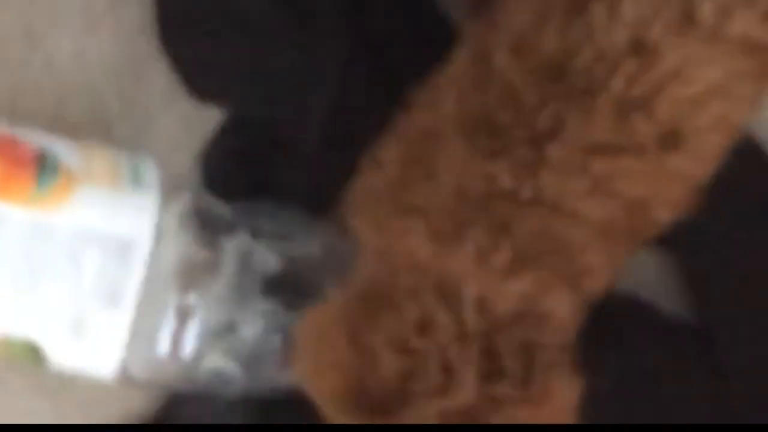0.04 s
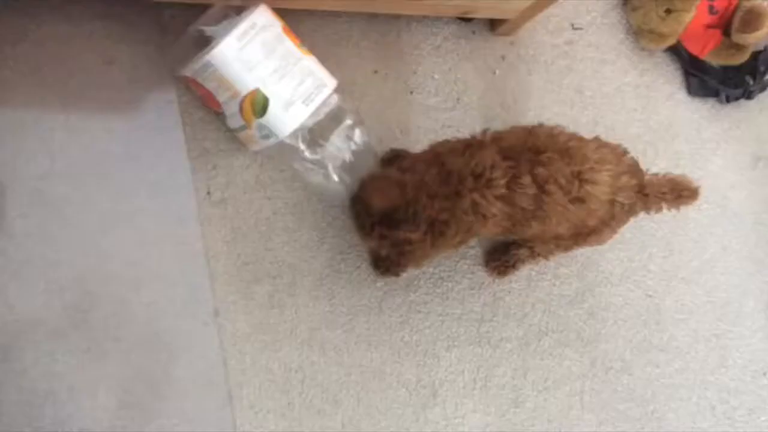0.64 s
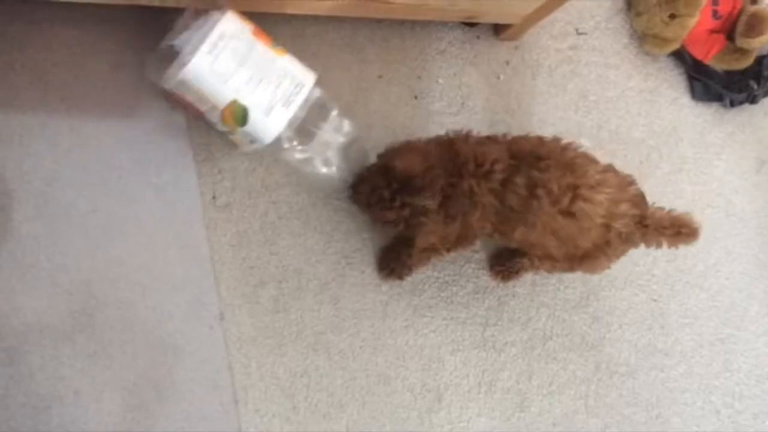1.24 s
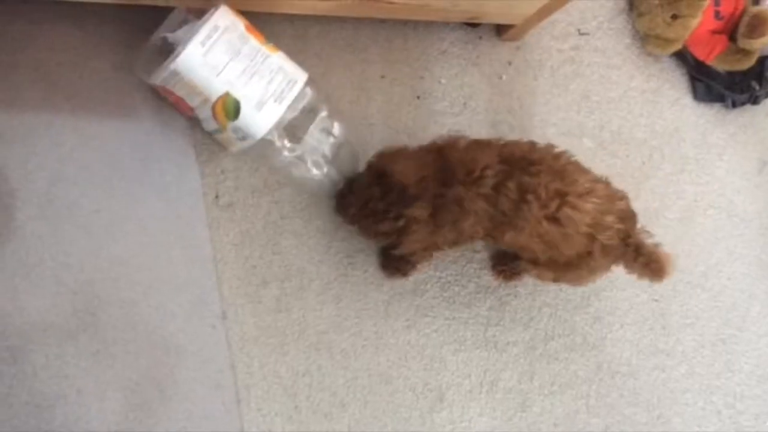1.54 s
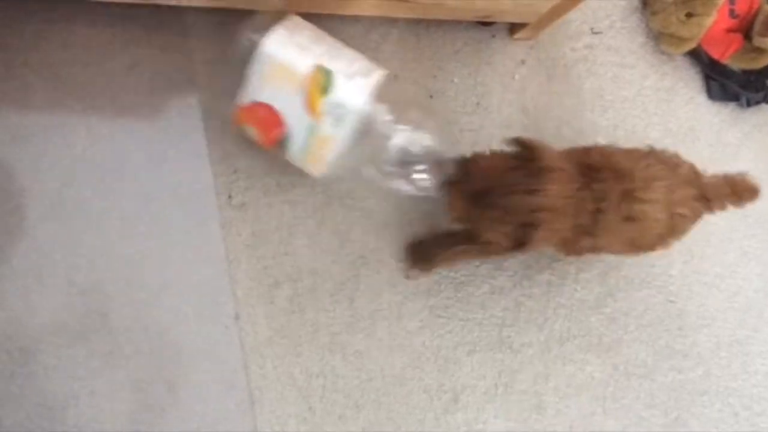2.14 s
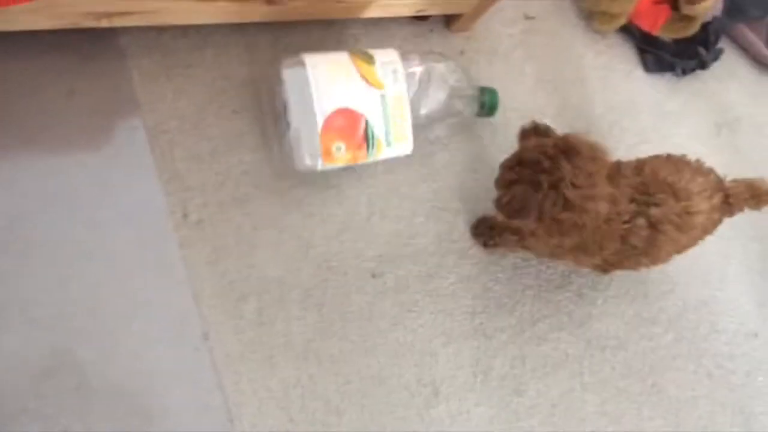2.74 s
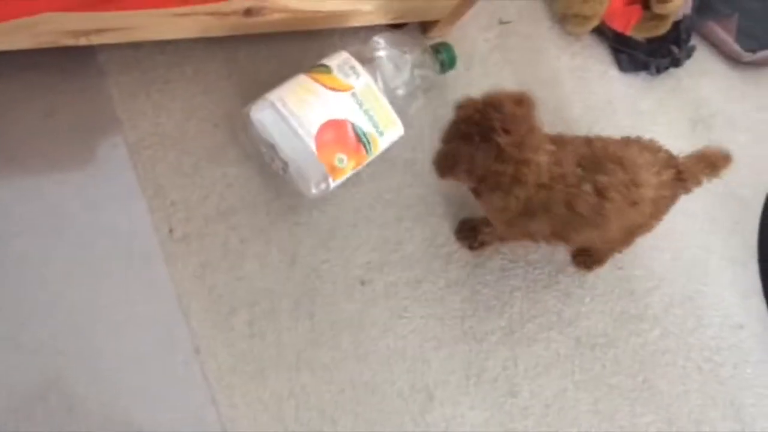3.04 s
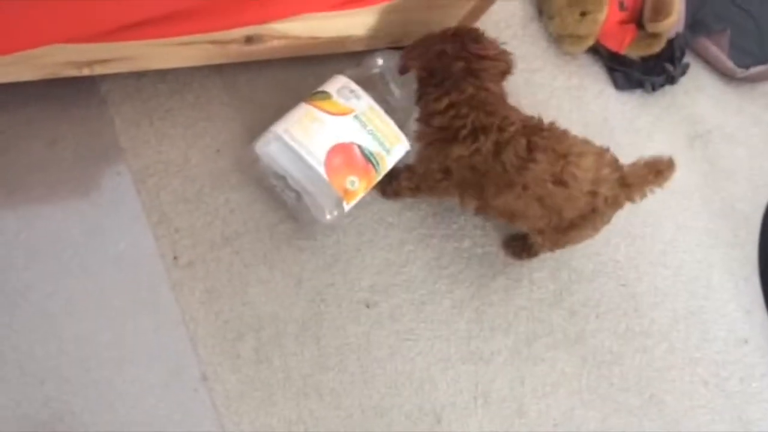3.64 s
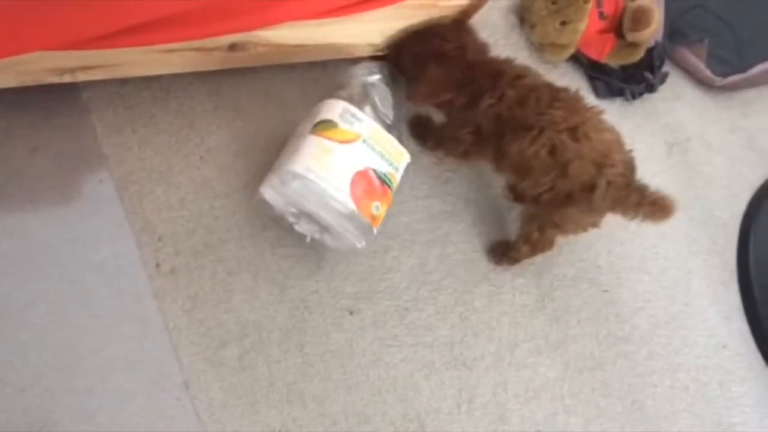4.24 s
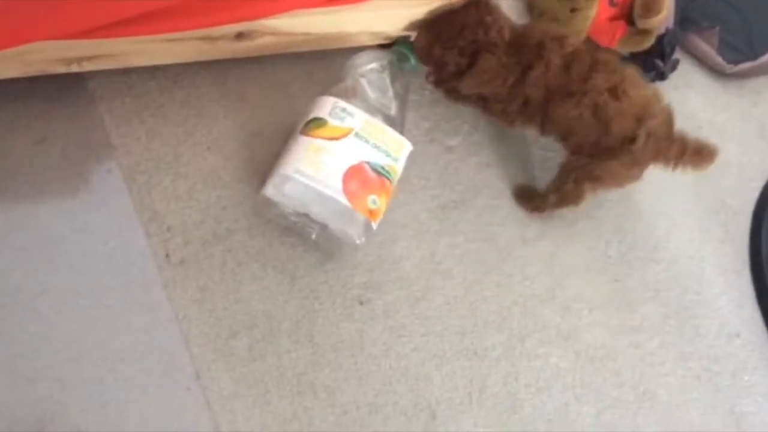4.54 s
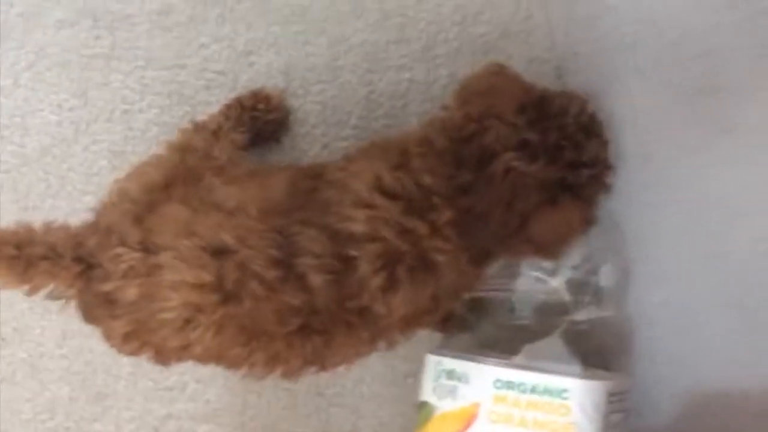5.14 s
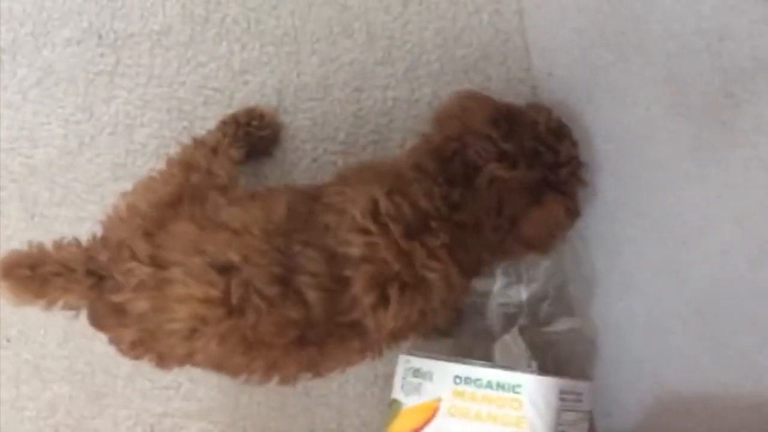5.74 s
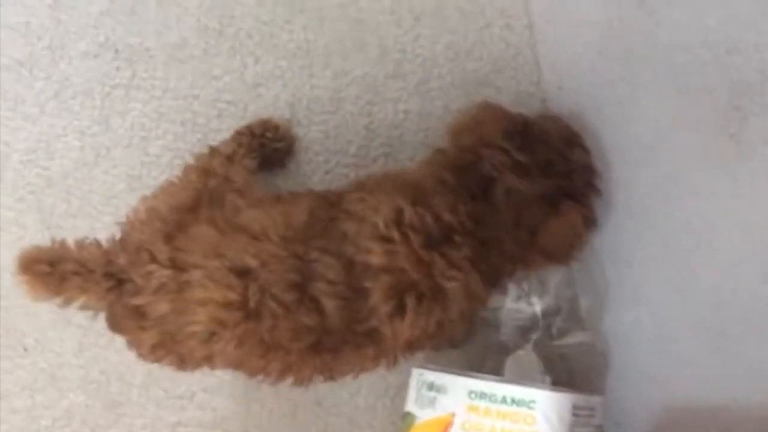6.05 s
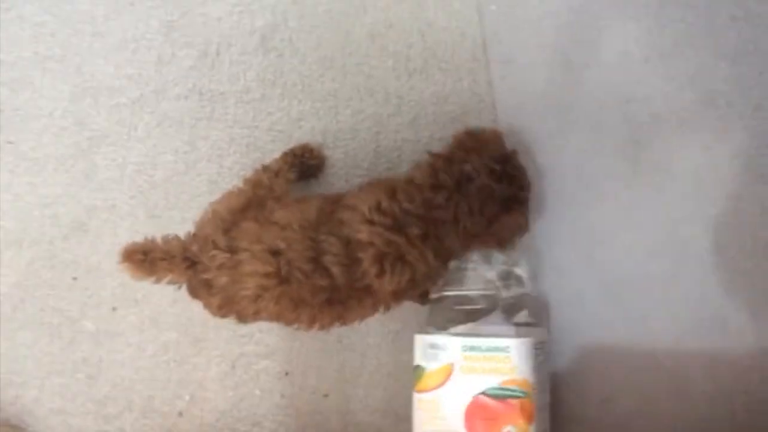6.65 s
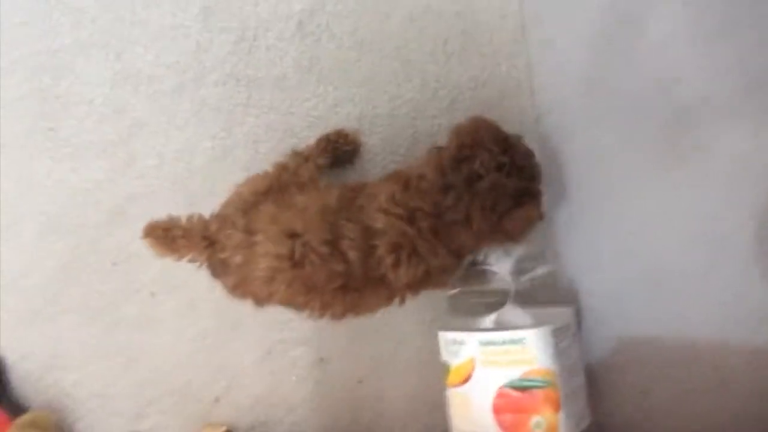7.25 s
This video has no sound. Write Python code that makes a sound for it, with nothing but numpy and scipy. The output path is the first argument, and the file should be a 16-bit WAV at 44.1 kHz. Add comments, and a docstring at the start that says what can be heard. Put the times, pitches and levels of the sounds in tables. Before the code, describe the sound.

Hollow knocks, crinkles and small snaps come in uneven bursts as a puppy paws and chews an empty plastic bottle indoors.

```python
"""In a small, quiet room, a puppy noses, paws and bites a big thin plastic bottle on the carpet.
Each knock bends a wall of the bottle, makes the air inside boom, rattles the stiff ribs and may
snap a crease. In between, tiny creases crackle, muzzle and paws scuff the plastic, and there are
brief squeaks and snuffles. Fur and carpet rustle over still air and the faint hum of an appliance."""
import sys
import numpy as np
from scipy import signal
from scipy.fft import rfft, irfft
from scipy.io import wavfile

SR = 44100
rng = np.random.default_rng(int(sys.argv[2]) if len(sys.argv) > 2 else 0)


def transcribe(u):
    """Save the signal u as a 16-bit wav file named by the first command-line argument.

    u: samples, shape (n,) or (channels, n), limited to [-1, 1]; the rate is SR.
    q: integer samples, one column per channel.
    """
    v = np.clip(np.atleast_2d(u).T, -1, 1)
    q = np.round(v * 32767).astype(np.int16)
    wavfile.write(sys.argv[1], SR, q)


N = 331191
TIME = np.arange(N) / SR
AGE = TIME[:SR // 3]  # seconds since a short sound began

# Knocks and bites. Each row: start in seconds, wall pitch in Hz, then the levels in dB of
# the wall's thud, the air's boom, the ribs' rattle and the crease's snap.
KNOCKS = [(0.709, 169, -38.5, -35, -50.5, -72), (1.126, 520, -39, -36, -43, -52.5),
          (1.179, 355, -31, -40, -42.5, -50), (1.249, 168, -28, -34, -41, -46.5),
          (1.274, 200, -37, -48, -48, -55), (1.283, 397, -32.5, -60, -41.5, -51.5),
          (1.332, 180, -36, -39, -55, -65), (1.376, 487, -35.5, -43.5, -48, -60.5),
          (1.409, 390, -42.5, -54, -50, -78), (1.422, 425, -50, -41.5, -52.5, -79),
          (1.543, 549, -46.5, -58, -57, -85), (1.574, 517, -39.5, -49, -54, -62),
          (1.586, 554, -38.5, -49, -59, -57.5), (1.633, 387, -42, -48, -53, -58),
          (1.699, 186, -45.5, -54, -61, -66), (1.746, 260, -42.5, -51.5, -58, -63.5),
          (1.827, 423, -46.5, -57, -51.5, -40), (1.999, 373, -52.5, -63, -57, -57.5),
          (2.323, 375, -58, -59, -66, -77), (2.359, 386, -54.5, -49, -63, -80),
          (2.374, 330, -63, -47.5, -56.5, -53), (2.501, 215, -38.5, -46.5, -55, -86),
          (2.509, 188, -41, -41, -65, -82), (2.541, 184, -46, -58, -80, -85),
          (2.594, 227, -45, -38, -58, -92), (3.201, 170, -58, -77, -87, -92),
          (3.916, 337, -66, -53, -38, -48), (3.938, 248, -43, -41, -50.5, -61),
          (3.974, 303, -55, -44, -49.5, -58.5), (4.084, 333.6, -27, -28.5, -38.5, -65),
          (4.24, 288.4, -36.5, -40.5, -39.5, -54), (4.344, 337, -27, -29, -40, -77),
          (4.644, 385, -43, -56, -45.5, -61), (4.654, 271, -38, -47, -53, -65),
          (4.72, 234, -47.5, -56, -65, -63), (4.813, 210, -53, -61, -58, -67),
          (4.829, 422, -50, -54, -53, -67), (4.872, 366, -43.5, -44.5, -52.5, -55.5),
          (4.906, 244, -50.5, -61, -61, -67.5), (4.994, 316, -54, -63, -56, -66),
          (5.012, 264, -50, -52, -52.5, -60), (5.064, 434, -35, -36.5, -36, -44.5),
          (5.083, 355, -49, -76, -44, -81), (5.232, 436, -33, -62, -41, -42.5),
          (5.235, 219, -34.5, -53, -53, -53), (5.377, 142, -46, -56.5, -57.5, -60.5),
          (5.615, 361, -52.5, -51.5, -58.5, -67), (5.668, 270, -49.5, -54, -63.5, -66),
          (5.701, 296, -37.5, -74, -56.5, -60.5), (5.789, 200, -51, -57, -63, -69),
          (5.872, 171, -46.5, -75, -60.5, -90), (6.027, 414, -51.5, -61, -78, -89),
          (6.072, 460, -36.5, -47, -54, -62.5), (6.256, 178, -44, -57.5, -58, -71),
          (6.575, 502, -42, -44, -44, -58), (6.585, 504, -30.5, -38, -45, -55),
          (6.775, 456, -32, -44, -37, -50.5), (6.928, 314, -42.5, -73, -53, -63),
          (6.944, 437, -44, -52.5, -61, -63.5), (6.965, 387, -46.5, -63, -57.5, -69),
          (7.28, 165, -44, -55.5, -60, -66), (7.424, 313, -42, -49.5, -60, -57.5)]
# How busy the puppy is. Each row: time in seconds, relative levels in dB of shuffling and of fur.
ACTIVITY = [(0.0, -66, -72), (1.15, -66, -77.5), (1.29, -45, -64.5), (1.51, -51, -75), (1.78, -54.5, -63),
            (2.11, -62.5, -75), (2.66, -61, -76.5), (3.43, -66, -74.5), (3.93, -63, -79.5),
            (4.14, -53, -74), (4.58, -63, -78), (4.96, -55, -72.5), (5.61, -56.5, -70.5),
            (5.85, -58, -77.5), (6.38, -63, -78), (6.71, -56.5, -73), (7.15, -62, -77.5),
            (7.51, -58.5, -72)]
# The tone of a light, brushing hiss. Each row: frequency in Hz, relative level in dB.
HISS_TONE = [(1000, 2.5), (2600, 4.5), (3600, 7.5), (5500, 10.5), (8000, 11), (11000, 8.5), (13000, -23)]


def knocks():
    """Blows land on the bottle. Sharp ones dent it, and it springs back with a lower, duller pop."""
    # The two snap levels in dB at which denting begins and is complete.
    dent_range_db = [-66, -54]
    spring_delay_s = 0.008
    out = np.zeros(N)
    for start, hz, thud_db, air_db, rib_db, snap_db in KNOCKS:
        add(out, start, knock(hz, thud_db, air_db, rib_db, snap_db))
        dent = np.interp(snap_db, dent_range_db, [0, 1])
        spring_back = knock(hz * 0.566, thud_db - 9, -np.inf, rib_db - 10, snap_db - 18)
        add(out, start + spring_delay_s, dent * spring_back)
    return out


def knock(wall_hz, thud_db, air_db, rib_db, snap_db):
    """One blow: a wall bends and shakes the shell, the air booms, the ribs rattle, the skin snaps."""
    # The notes of a dented wall. Each row: multiple of its pitch, relative dB, ring time in seconds.
    wall_notes = [(.52, -15, 0.021), (.78, -3.5, 0.064), (1, 5, 0.062), (1.4, -11, 0.035)]
    # The notes of the whole shell, the air inside, and the stiff ribs and shoulder.
    # Each row: pitch in Hz, relative level in dB, ring time in seconds.
    shell_notes = [(162.8, -9, 0.084), (226, -0.5, 0.048), (273.6, -7, 0.08), (464.4, -0.5, 0.062),
                   (531.5, 0.5, 0.091), (588.7, -8, 0.11), (764, -18.5, 0.18)]
    air_notes = [(315, -2, 0.11), (316.7, -18, 0.24)]
    rib_notes = [(713, 8, 0.052), (757, -5.5, 0.16), (807, 2.5, 0.053), (955, -27, 0.066), (999, 5.5, 0.03),
                 (1033, 20.5, 0.0078), (1173, -13.5, 0.038), (1330, -8, 0.085), (1434, 4.5, 0.038),
                 (1524, 3.5, 0.045), (1675, -7, 0.012), (1733, 5.5, 0.039), (1917, 3.5, 0.047),
                 (2140, 1, 0.059), (2250, -5, 0.026)]
    push_cycles = 5.6  # a slack wall gives way more slowly than a stiff one
    wall = sum(gain(db) * ring(wall_hz * multiple, ring_s) for multiple, db, ring_s in wall_notes)
    wall = level_hit(wall * rise(push_cycles / wall_hz))
    # a wide, slack wall shakes the shell's low notes, a small stiff one its high notes
    shell = ring_notes(shell_notes, detune=0.028, tilt_db=7.5 * np.log2(wall_hz / 380))
    shell = level_hit(shell * rise(0.0022))
    thud = gain(thud_db - 3) * (wall + shell)
    air = sum(gain(db) * ring(hz, ring_s) for hz, db, ring_s in air_notes)
    air = level_hit(air * rise(0.014))
    # teeth, which snap the skin, also reach the higher ribs; soft paws do not
    ribs = ring_notes(rib_notes, detune=0.035, tilt_db=0.34 * (snap_db - rib_db + 13))
    ribs = level_hit(buckle(ribs, spread_s=0.007, after_db=-8.5))
    return thud + gain(air_db) * air + gain(rib_db) * ribs + snap(snap_db)


def snap(db):
    """A gentle touch crinkles the thin plastic skin; a hard bite pops one crease through at once."""
    # The tone of the pop. Each row: frequency in Hz, relative level in dB.
    pop_tone = [(600, -3), (1200, -3), (2100, 18), (2700, 0), (3500, 6), (4400, -0.5), (5500, 6.5),
                (7000, -1), (10500, -6), (13000, -14)]
    # The notes of a popping crease. Each row: pitch in Hz, relative dB, ring time in seconds.
    crease_notes = [(2010, -16.5, 0.011), (2850, -14, 0.026), (3020, 2.5, 0.03), (3430, 11, 0.017),
                    (3670, 15, 0.016), (4900, 12, 0.012), (5480, -13, 0.007), (5670, -4, 0.0088)]
    hardness = np.interp(db, [-72, -44], [0, 1])
    crinkle_noise, tick_noise = rng.standard_normal((2, len(AGE)))
    crinkle = level_hit(colour(crinkle_noise * fade(0.17) * rise(0.0083), HISS_TONE))
    tick = tick_noise * (fade(0.0096) + gain(-13.5) * fade(0.084))
    ticks = buckle(tick, spread_s=0.0036, after_db=-5.5 - 12 * hardness)
    crease = level_hit(ring_notes(crease_notes, detune=0.069))
    pop = level_hit(colour(ticks, pop_tone)) + hardness ** 3 * gain(-8) * crease
    return gain(db) * level_hit(gain(2.5) * (1 - hardness) * crinkle + (1.4 + hardness) * pop)


def buckle(sound, spread_s, after_db, count=7):
    """A crease gives way in one jump, then a few smaller ones. Each jump sets off the sound."""
    jumps = np.zeros(len(AGE))
    jumps[0] = 1
    delays = rng.exponential(1, count) * spread_s
    sizes = gain(after_db) * rng.standard_normal(count) * np.exp(-delays / spread_s / 2)
    np.add.at(jumps, np.minimum(delays * SR, len(AGE) - 1).astype(int), sizes)
    return signal.fftconvolve(sound, jumps)[:len(AGE)]


def nudges(count=12, middle_hz=296, spread_octaves=0.3):
    """Nose and paws touch the bottle lightly, more often and harder while the puppy is busy."""
    # The levels of thud, boom, rattle and snap, in dB above the puppy's shuffling level.
    offsets_db = [2, -11, -5, -17]
    out = np.zeros(N)
    times, shuffle_db, _ = np.transpose(ACTIVITY)
    busy_db = np.interp(TIME, times, shuffle_db)
    effort = np.cumsum(gain(busy_db))
    for k, (chance, spot) in enumerate(rng.uniform(0, 1, (count, 2))):
        start = np.interp((k + chance) / count, effort / effort[-1], TIME)
        levels = np.interp(start, TIME, busy_db) + np.array(offsets_db)
        wall_hz = middle_hz * 2 ** (spread_octaves * (2 * spot - 1))
        add(out, start, knock(wall_hz, *levels))
    return out


def crackle(offset_db=-16, count=900):
    """Tiny creases keep giving way, louder the more the puppy pushes the bottle about."""
    # The tone of the tiny ticks. Each row: frequency in Hz, boost or cut in dB.
    tick_tone = [(200, -8.5), (500, -2), (1000, 1), (2000, 7), (2700, -4.5), (3600, -4), (6000, -8.5),
                 (11000, -21)]
    out = np.zeros(N)
    times, shuffle_db, _ = np.transpose(ACTIVITY)
    decay = fade(0.11)[:SR // 30]
    for start, size in zip(rng.uniform(0, TIME[-1], count), rng.standard_normal(count)):
        db = np.interp(start, times, shuffle_db) + offset_db + 3 * size
        add(out, start, gain(db) * level_hit(decay * rng.standard_normal(len(decay))))
    return colour(out, tick_tone)


def scuffs(swell_share=0.2):
    """Muzzle and paws slide on plastic and carpet: a rasp and a hiss that swell and let go."""
    # The slides. Each row: start in seconds, length in seconds, relative dB of rasp and of hiss.
    slides = [(0.474, 0.1, -78, -77), (0.705, 0.079, -58.5, -64.5), (1.22, 0.071, -56, -61.5),
              (1.34, 0.066, -54.5, -67.5), (1.927, 0.071, -52, -70), (2.093, .04, -68, -74.5),
              (2.479, 0.024, -55, -62), (2.619, 0.079, -71, -69), (2.717, 0.066, -73, -70.5),
              (2.805, 0.21, -82, -76.5), (2.975, 0.061, -51.5, -72), (3.376, 0.013, -61.5, -60),
              (3.403, 0.024, -84, -70), (4.039, 0.053, -48, -78), (4.321, 0.044, -49.5, -66.5),
              (5.462, 0.069, -48.5, -71), (6.318, 0.045, -51, -71), (6.553, 0.087, -60.5, -69),
              (6.818, 0.037, -51.5, -73.5), (6.902, 0.076, -56.5, -75), (7.142, 0.14, -59.5, -76),
              (7.29, 0.045, -56.5, -64.5), (7.317, 0.044, -51.5, -62), (7.39, 0.06, -58, -66)]
    # The tone of the rubbed wall. Each row: frequency in Hz, relative level in dB.
    rasp_tone = [(150, 15), (400, 5), (900, 6), (1500, 4), (1950, 2), (2600, -6.5), (4000, -9.5),
                 (8000, -26)]
    rasp, hiss = np.zeros(N), np.zeros(N)
    for start, length, rasp_db, hiss_db in slides:
        peak, end = start + length * swell_share, start + length
        times = [start - 0.004, start, peak, end, end + 0.087]
        pressure = np.interp(TIME, times, [0.0018, 0.76, 1.73, 0.3, 0.0051])
        rasp += gain(rasp_db) * pressure
        hiss += gain(hiss_db) * pressure
    return rasp * rubbing(rasp_tone, grit_db=0) + hiss * rubbing(HISS_TONE, grit_db=2)


def grainy_tones(grain_gap_s=0.0026):
    """Brief, grainy tones: squeaks on the plastic, a short ring with a knock, and the tone of snuffles."""
    # The tones. Each row: start in seconds, length in seconds, level in dB, pitch in Hz.
    tones = [(2.494, .018, -44.5, 1080), (2.982, .04, -53.5, 1110), (3.388, .04, -68, 5500),
             (4.032, 0.024, -48, 1970), (4.148, 0.026, -56.5, 1950), (4.284, .055, -54, 1810),
             (5.486, .035, -54, 1600), (5.658, .02, -62, 1990), (6.607, .085, -51.5, 1850)]
    out = np.zeros(N)
    for start, length, db, hz in tones:
        delays = np.cumsum(rng.gamma(3, grain_gap_s / 3, 64))
        sizes, bends = rng.standard_normal((2, 64))
        for delay, size, bend in zip(delays, sizes, bends):
            if delay < length:
                add(out, start + delay, gain(db + 2 * size) * ring(hz * (1 + 0.056 * bend), 0.032))
    return out


def rustle():
    """Paws shuffle, fur brushes the carpet, and the rocking bottle adds to both sounds."""
    # The dull tone of shuffling. Each row: frequency in Hz, relative level in dB.
    shuffle_tone = [(40, -23.5), (100, -3), (180, 6), (320, 3), (500, -5), (900, -10.5), (2000, -25.5),
                    (3500, -47.5)]
    times, shuffle_db, fur_db = np.transpose(ACTIVITY)
    paws = gain(np.interp(TIME, times, shuffle_db) + 3 * drift(22) - 4)
    fur = gain(np.interp(TIME, times, fur_db) + drift(30) - 1)
    rock = rocking()
    shuffle = np.hypot(paws, gain(-15.5) * rock) * rubbing(shuffle_tone, grit_db=3.5)
    brush = np.hypot(fur, gain(-38) * rock) * rubbing(HISS_TONE, grit_db=1.5)
    return shuffle + brush


def rocking(settle_s=0.12):
    """How much the bottle rocks: each knock sets it going and the carpet stills it."""
    power = np.zeros(N)
    for start, _, thud_db, *_ in KNOCKS:
        add(power, start, (gain(thud_db) * fade(settle_s) * rise(0.028)) ** 2)
    return np.sqrt(power)


def rubbing(tone, grit_db):
    """Rubbing surfaces catch many times over. More grit makes the catches more uneven."""
    catches = rng.standard_normal(N) * gain(grit_db * drift(450))
    return level(colour(catches, tone))


def room(sound):
    """Nearby furniture echoes the sound almost at once, then the walls add a short tail."""
    # Echoes off the furniture. Each row: delay in seconds, level in dB.
    echoes = [(.0032, -30), (.0063, -30), (0.0124, -21.5)]
    # The room's tail. Each row: low and high edge in Hz, fade time in seconds, relative level in dB.
    tail_bands = [(69, 253, 0.35, -9.5), (233, 1660, 0.47, -20.5), (884, 3760, 0.13, -11),
                  (2800, 8400, 0.11, -12)]
    response = np.zeros(len(AGE))
    for delay_s, db in echoes:
        response[int(delay_s * SR)] += gain(db)
    for low_hz, high_hz, fade_s, db in tail_bands:
        band = signal.butter(3, [low_hz, high_hz], "band", fs=SR, output="sos")
        tail = rng.standard_normal(len(AGE)) * fade(fade_s) * (AGE > 0.005)
        response += gain(db) * signal.sosfilt(band, tail / np.linalg.norm(tail))
    return sound + signal.fftconvolve(sound, response)[:N]


def air_and_hum(air_db=-62.5):
    """Still indoor air and the slightly wavering mains hum of an appliance."""
    # The air's tone and the hum's notes. Each row: frequency in Hz, level in dB (relative for the air).
    air_tone = [(25, -0.5), (45, 6.5), (70, -1), (110, 9), (170, -12), (260, -17), (500, -22.5), (900, -18),
                (1900, -25.5), (3000, -26), (8000, -39.5), (11500, -34.5)]
    hum_notes = [(59.5, -77), (119.6, -63.5), (710.5, -80.5)]
    air = level(colour(rng.standard_normal(N), air_tone)) * gain(air_db + 0.5 * drift(3))
    hum = sum(gain(db + 2.2 * drift(3)) * np.sin(2 * np.pi * hz * TIME + 0.45 * drift(4))
              for hz, db in hum_notes)
    return air + hum


def ring_notes(notes, detune, tilt_db=0, scatter_db=0.5):
    """Ring a part hit at a random spot. Dents shift its notes; tilt_db is the boost per octave."""
    out = np.zeros(len(AGE))
    for hz, db, ring_s in notes:
        side, size, bend = rng.standard_normal(3)
        strength = gain(db + scatter_db * size + tilt_db * np.log2(hz))
        out += np.sign(side) * strength * ring(hz * (1 + detune * bend), ring_s)
    return out


def ring(hz, ring_s):
    """One pure note that dies away."""
    return fade(ring_s) * np.sin(2 * np.pi * hz * AGE)


def fade(seconds):
    """Fall from 1, dropping 60 dB in the given time."""
    return np.exp(-np.log(1000) * AGE / seconds)


def rise(seconds):
    """Climb from 0 to almost 1 in the given time."""
    return 1 - fade(seconds)


def drift(steps_per_s):
    """Wander at random around zero, with a spread near 1."""
    steps = rng.standard_normal(4096)
    return level(np.interp(TIME * steps_per_s, np.arange(len(steps)), steps))


def colour(sound, tone, size=4096):
    """Filter a sound along a curve of (Hz, dB) points."""
    hz, db = np.transpose(tone)
    grid_hz = np.arange(size // 2 + 1) * SR / size + 1
    curve = gain(np.interp(np.log(grid_hz), np.log(hz), db))
    # these steps make the filter ring only after a hit, never before it
    cepstrum = irfft(np.log(curve))[:size // 2]
    cepstrum[1:] *= 2
    response = irfft(np.exp(rfft(cepstrum, size)))
    return signal.fftconvolve(sound, response)[:len(sound)]


def gain(db):
    """Turn decibels into a number to multiply by."""
    return 10 ** (np.asarray(db) / 20)


def level(sound):
    """Scale a sound to an average power of 1."""
    return sound / np.sqrt(np.mean(sound ** 2))


def level_hit(sound, attack_s=0.02):
    """Scale a hit so that its opening moment has an average power of 1."""
    return sound / np.sqrt(np.mean(sound[:int(attack_s * SR)] ** 2))


def add(track, start_s, sound):
    """Mix a sound into the track at the given time."""
    start = max(int(start_s * SR), 0)
    track[start:start + len(sound)] += sound[:N - start]


def scene():
    """The puppy and the bottle in the room, as one channel."""
    play = knocks() + nudges() + crackle() + scuffs() + grainy_tones() + rustle()
    return (room(play) + air_and_hum())[None]


def record(dry, low_cut_hz=63, top_hz=11900):
    """A phone held above the floor thins the deep bass and cuts the highest treble."""
    bass_cut = signal.butter(2, low_cut_hz, "high", fs=SR, output="sos")
    treble_cut = signal.ellip(8, 0.2, 60, top_hz, fs=SR, output="sos")
    return signal.sosfilt(treble_cut, signal.sosfilt(bass_cut, dry))


dry = scene()
out = record(dry)
transcribe(out)
```